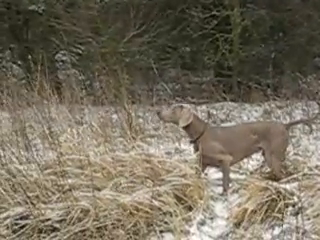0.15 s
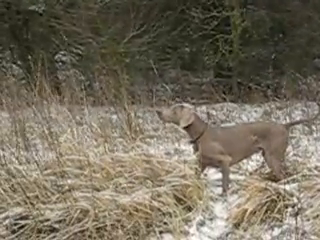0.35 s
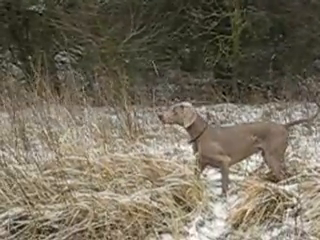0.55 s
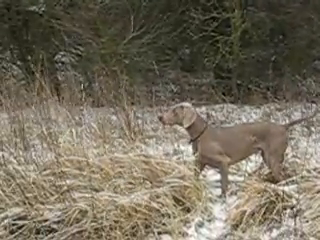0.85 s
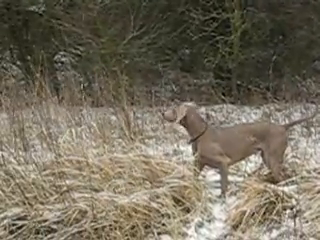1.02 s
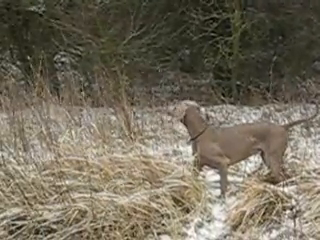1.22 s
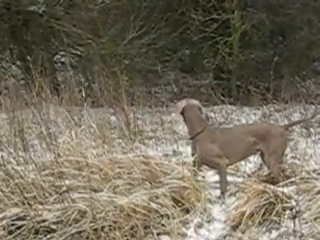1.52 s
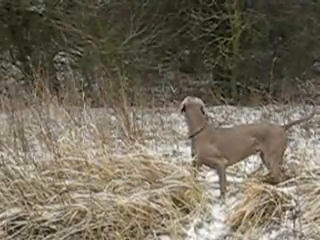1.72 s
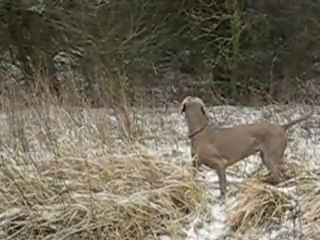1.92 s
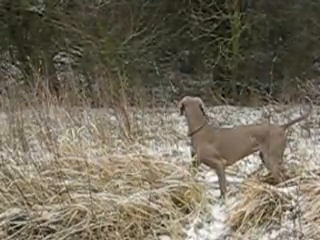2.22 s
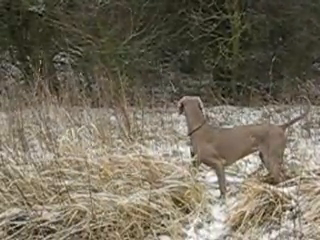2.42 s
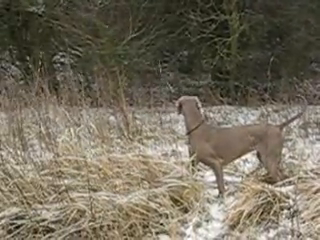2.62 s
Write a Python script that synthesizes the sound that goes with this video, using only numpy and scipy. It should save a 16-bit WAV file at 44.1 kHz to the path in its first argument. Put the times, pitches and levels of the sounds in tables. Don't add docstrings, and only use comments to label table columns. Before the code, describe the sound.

A game bird's whistling, clapping wing flutter fades into the distance amid low, bumpy wind noise outdoors

```python
import sys
import numpy as np
from scipy import signal
from scipy.fft import rfft, irfft, next_fast_len
from scipy.io import wavfile
from scipy.ndimage import map_coordinates

SR = 44100
rng = np.random.default_rng(int(sys.argv[2]) if len(sys.argv) > 2 else 0)


def gain_from_decibels(decibels):
    exponent = np.asarray(decibels, float) / 20
    return 10 ** exponent


def inscribe(sig):
    pcm = np.round(np.clip(np.atleast_2d(sig).T, -1, 1) * 32767)
    wavfile.write(sys.argv[1], SR, pcm.astype(np.int16))


N = 121275

# (frequency [Hz], level [dB])
AIR = [(300, -4), (1000, -0.5), (2200, 1), (3400, 1), (4600, -4), (6500, -19)]


def unit(x):
    return x / np.sqrt(np.mean(x ** 2) + 1e-20)


def along(points, hz):
    f, v = np.transpose(points)
    return gain_from_decibels(np.interp(np.log(hz + 1), np.log(f + 1), v))


def wobble(rate, size=N):
    knots = rng.standard_normal(int(size / SR * 4000) + 8)
    return map_coordinates(knots, [2 + np.arange(size) * min(rate, 3900) / SR])


def filtered(x, response):
    m = next_fast_len(N + SR // 2)
    hz = np.fft.rfftfreq(m, 1 / SR)
    return irfft(rfft(x, m) * response(hz), m)[..., :N]


def noise(spectrum):
    return unit(filtered(rng.standard_normal(N), lambda hz: along(spectrum, hz)))


def add(out, s, x):
    i = round(s * SR)
    part = out[max(i, 0):][:len(x) + min(i, 0)]
    part += x[max(-i, 0):][:len(part)]


def glide(hz, sag, u):
    cycles = np.cumsum(hz * (1 - sag * np.minimum(u, 1))) / SR
    return np.sin(2 * np.pi * (cycles + rng.random()))


def strokes():
    # (time [s], whistle level [dB], puff level [dB], air level [dB], moment of full force [0-1])
    downstrokes = [(-.004, -30.5, -22, -38.5, 0.5), (.071, -41.5, -36, -41, 0.9),
                   (.149, -40, -27, -35, 0.5), (.228, -33.5, -33.5, -44.5, 0.65),
                   (0.307, -38, -34, -41.5, 0.7), (.381, -30, -21.5, -34, 0.82),
                   (0.46, -30.5, -30.5, -47.5, 0.8), (.535, -31.5, -34, -38, 0),
                   (.612, -33.5, -34.5, -45, 0.19), (.769, -31.5, -24, -34.5, 0.72),
                   (.845, -32, -33, -37, 0.4), (.924, -44, -56.5, -37.5, 0.9),
                   (1.002, -29.5, -32, -36.5, 0.7), (1.238, -28, -27.5, -35, 0.1),
                   (1.312, -33, -30.5, -37, 0.2), (1.389, -35.5, -34.5, -39.5, 0.2),
                   (1.466, -33, -38, -46, 0.05), (1.543, -38, -35.5, -39.5, 0), (1.621, -43, -32, -40, 1),
                   (1.694, -39.5, -32.5, -38, 0), (1.771, -36, -37.5, -40, .24),
                   (1.85, -40, -54, -41.5, 0.8), (1.928, -36, -42, -44, 0.9),
                   (2.008, -38.5, -43, -56.5, 0.42), (2.082, -40, -47, -47, 0.3),
                   (2.165, -42.5, -44.5, -47, .3), (2.248, -45, -41.5, -54, 0.1),
                   (2.328, -35.5, -37, -54, 0.32), (2.411, -35.5, -31.5, -39, 0),
                   (2.492, -37, -36, -46.5, 0.3)]
    # (time [s], whistle onset pitch [Hz], puff pitch [Hz], fade [share of a stroke])
    effort = [
        (0, 3715, 640, 0.21),
        (0.499, 3758, 616, 0.44),
        (1.001, 3830, 585, .65),
        (1.25, 4040, 505, 0.41),
        (1.451, 4070, 584, .25),
        (1.8, 3880, 598, 0.19),
        (2.1, 3710, 614, .4),
        (2.5, 3426, 603, 0.7),
    ]
    stroke_s, puff_s = 0.012, 0.016
    end_hz = 3127
    rough = 0.42
    second_ratio, second_db = 0.75, -10
    under_ratio, under_db = 0.733, -11.5
    puff_sag = 0.16
    out, t, air = np.zeros(N), np.arange(SR // 25) / SR, noise(AIR)
    size = len(t)
    u, v = t / stroke_s, np.minimum(t / puff_s, 1)
    when, *courses = np.transpose(effort)

    def flutter():
        return 1 - rough + rough * wobble(700, size=size)

    for s, whistle_db, puff_db, air_db, crest in downstrokes:
        hz, puff_hz, fade = [np.interp(s, when, c) for c in courses]
        crest = np.clip(crest, 0.08, 0.92)
        rise = np.minimum(1, t / 0.0012) * (0.55 + 0.45 * (u / crest) ** 2)
        fall = np.exp(-np.abs((u - crest) / fade) ** 2)
        force = np.where(u < crest, rise, fall)

        sag, sink = 1 - end_hz / hz, u / (crest + fade)
        whistle = flutter() * glide(hz, sag, sink)
        whistle += gain_from_decibels(second_db) * flutter() * glide(hz * second_ratio, sag, sink)

        hollow = glide(puff_hz * (1 + 0.03 * rng.standard_normal()), puff_sag, v)
        hollow += gain_from_decibels(under_db + rng.normal(0, 3.4)) * glide(puff_hz * under_ratio, puff_sag, v)
        puff = np.sin(np.pi * v ** 0.88) * (1 + 0.54 * wobble(120, size=size)) * hollow

        grain = gain_from_decibels(2 * wobble(577, size=size))
        swell = 0.4 * force + np.sin(np.pi * v ** 0.97) ** 0.29
        swish = swell * grain * air[rng.integers(N // 2):][:size]

        beat = gain_from_decibels(whistle_db - 2 - 3.5) * unit(force * whistle)
        beat += gain_from_decibels(puff_db - 6 - 1.5) * unit(puff)
        beat += gain_from_decibels(air_db - 2 - 4.5) * unit(swish)
        add(out, s, beat)
    return out


def snaps():
    # (time [s], peak level [dB], pitch [Hz], thud level relative to peak [dB])
    snap_events = [(.0181, -19, 3450, -18), (.094, -18, 3420, -7), (.1704, -19, 3290, -6),
                   (.2474, -18.5, 3380, -13), (.3259, -20.5, 3435, -14.5), (.4036, -23.5, 3730, -5),
                   (.4797, -13, 3530, -11.5), (.5562, -18.5, 3535, -25), (.6335, -16, 3630, -12),
                   (.714, -29, 3480, -6), (.7909, -18, 3723, -8), (.8675, -16.5, 3615, -10),
                   (.9457, -16, 3590, -11), (1.0222, -17.5, 3694, -10), (1.2584, -23.5, 3290, -11),
                   (1.4876, -22.5, 3520, -13), (1.7138, -20.5, 3510, -12.5), (1.7908, -24, 3550, -20),
                   (1.8676, -21.5, 3500, -9), (1.946, -24, 3600, -7), (2.027, -33, 3500, -15),
                   (2.1893, -26, 3370, -11.5), (2.2735, -33, 3300, -2), (2.3555, -33, 3500, -15),
                   (2.4369, -31, 3470, -20), (2.4571, -32, 3290, -18), (.0805, -28, 3200, -20),
                   (.157, -23, 3150, -20), (.4662, -20, 3400, -20), (.6205, -25, 3500, -20),
                   (.778, -21, 3350, -15), (1.248, -26, 3300, -8), (1.7035, -29, 3300, -20)]
    rise_s, fall_s, sag, crack_db = 0.0016, 0.0013, 0.15, -15
    bounce_s, bounce_db = 0.0058, -12
    thud_hz, thud_peak_s, thud_lag_s, thud_gain_db = 510, 0.002, 0.00074, 4
    out, gate, t = np.zeros(N), np.zeros(N), np.arange(SR // 25) / SR
    rise = np.sin(np.pi / 2 * np.minimum(t / rise_s, 1)) ** 2
    shape = rise * np.exp(-(np.maximum(t - rise_s, 0) / fall_s) ** 0.85)
    thud_shape = t / thud_peak_s * np.exp(1 - t / thud_peak_s)
    for s, db, hz, thud_db in snap_events:
        add(out, s, gain_from_decibels(db) * shape * glide(hz * (1 + sag / 2), sag, t / 0.0033))
        bounce = gain_from_decibels(db + bounce_db + rng.normal(0, 2)) * shape * glide(hz, sag / 2, t / 0.004)
        add(out, s + bounce_s, bounce)
        add(gate, s, gain_from_decibels(db + crack_db) * shape)
        thud = thud_shape * glide(thud_hz * (1 + 0.054 * rng.standard_normal()), 0.18, t / 0.0093)
        add(out, s + thud_lag_s, gain_from_decibels(db + thud_db + thud_gain_db) * thud)
    return out + gate * noise(AIR)


def field(x):
    echo_t60, echo_lag_s = 0.31, 0.0091
    t, out, step = np.arange(SR // 3) / SR, np.zeros(N), SR // 13
    air = noise(AIR)
    decay = gain_from_decibels(-60 * t / echo_t60) * (t > echo_lag_s)
    for i in range(0, N, step):
        tail = np.roll(air, -rng.integers(N))[:len(t)] * decay
        add(out, i / SR, signal.fftconvolve(x[i:i + step], tail / np.linalg.norm(tail)))
    return out


def wind():
    # (time [s], wind strength [dB], sharpness [dB])
    gusts = [(0, -39, -18.5), (0.362, -33.5, -1.5), (0.411, -28.5, -7), (0.599, -34, 14), (0.718, -31, 2.5),
             (.92, -29, 3), (1.201, -32, -16), (1.402, -28, -5.5), (1.952, -30, -1), (2.222, -32.5, -7),
             (2.37, -29.5, 7), (2.75, -29.5, -10)]
    # (time [s], swing [full scale, push +, pull -], pitch [Hz])
    bumps = [(.1141, -.23, 180), (.3982, -.08, 105), (.409, .07, 120), (.4252, .09, 105), (.4379, .07, 110),
             (.4435, -.11, 107), (.5363, .07, 86), (.6403, -.07, 132), (.652, .06, 110), (.6565, -.12, 148),
             (.6722, -.08, 198), (.6794, -.08, 100), (.6869, .09, 177), (.7093, -.07, 106),
             (.7275, .12, 124), (.7415, .08, 110), (.75, -.08, 80), (.7877, -.07, 75), (.7942, .1, 125),
             (.818, .08, 212), (.8459, -.06, 80), (.8518, .08, 90), (.8749, .14, 81), (.8844, -.07, 70),
             (.9291, -.07, 109), (1.3003, .1, 80), (1.3967, -.09, 87), (1.4027, .07, 100),
             (1.4122, -.09, 141), (1.4171, .05, 100), (1.4217, -.07, 100), (1.4654, .07, 93),
             (1.5508, .07, 109), (1.5985, .08, 72), (1.6226, -.12, 160), (1.6257, .14, 170),
             (1.6415, .09, 110), (1.6632, -.08, 131), (1.9058, .08, 93), (1.9784, .1, 120),
             (1.9821, -.08, 128), (2.3472, -.09, 126), (2.3619, -.08, 190), (2.365, .1, 170),
             (2.3682, -.19, 168), (2.3746, -.14, 196), (2.3803, .07, 177), (2.4161, -.08, 204),
             (2.4505, .09, 146), (2.4588, -.11, 82), (2.4761, -.15, 140), (2.4961, -.1, 80),
             (2.5302, .14, 140), (2.5475, .2, 200), (2.5526, -.08, 70), (2.5977, -.11, 111),
             (2.6185, -.11, 95), (2.6246, .1, 90), (2.657, .09, 95), (2.7346, .08, 80)]
    # (frequency [Hz], spectral density [dB per Hz])
    rumble = [(15, -2), (40, -0.5), (80, -0.5), (160, -12.5), (300, -21), (600, -51)]
    # (frequency [Hz], spectral density [dB per Hz])
    rasp = [(60, -9), (150, 3.5), (300, -4), (550, -7.5), (900, -25), (1500, -41.5)]
    rasp_db, rasp_grows = -10, 2.6
    bump_cycles, bump_db = 0.26, 0.5
    s, *cols = np.transpose(gusts)
    gust_db, sharp_db = [np.interp(np.arange(N) / SR, s, c) for c in cols]
    mean_db = gust_db.mean()
    out = gain_from_decibels(gust_db) * unit(gain_from_decibels(1.5 * wobble(22)) * noise(rumble))
    rasp_level = gain_from_decibels(mean_db + rasp_grows * (gust_db - mean_db) + sharp_db + rasp_db)
    out += rasp_level * unit(gain_from_decibels(2.5 * wobble(45)) * noise(rasp))
    t = np.arange(SR // 20) / SR
    for s, swing, hz in bumps:
        c = t * hz - 1
        bump = np.cos(2 * np.pi * c) * np.exp(-(c / bump_cycles) ** 2 / 2)
        add(out, s - 1 / hz, swing * gain_from_decibels(bump_db) * bump)
    return out


def eddies():
    # (time [s], peak level [dB], pitch [Hz])
    shed = [(.671, -20.5, 686), (0.706, -26.5, 543), (.811, -27.5, 640), (.894, -32, 560),
            (1.242, -23.5, 747), (1.372, -30, 600), (2.36, -28.5, 463), (2.374, -25.5, 792),
            (2.399, -20, 520), (2.421, -29.5, 551), (2.541, -23.5, 476)]
    out, t = np.zeros(N), np.arange(SR // 25) / SR
    for s, db, hz in shed:
        u = np.minimum(t * hz / 5.4, 1)
        shape = np.sin(np.pi * u ** 0.71) * (1 + 0.45 * wobble(180, size=len(t)))
        add(out, s, gain_from_decibels(db) * shape * glide(hz, 0.26, u))
    return out


def stalks():
    # (time [s], peak level [dB], pitch [Hz])
    ticks = [(.1176, -40, 5400), (.3222, -36, 5400), (.5157, -41, 5400), (.627, -41, 5400),
             (.841, -37, 5400), (1.1525, -30, 2500), (1.153, -34, 3500), (2.0113, -34, 5400),
             (2.0453, -38, 4500), (2.177, -43, 5400), (2.4019, -35, 4600), (2.4124, -36, 5400),
             (2.4245, -37, 1900), (2.472, -38, 4000)]
    tick_t60 = 0.007
    out, t = np.zeros(N), np.arange(SR // 50) / SR
    for s, db, hz in ticks:
        ring = glide(hz, 0.1, t / 0.004) + 0.7 * (hz / 5400) ** 2 * rng.standard_normal(len(t))
        add(out, s, gain_from_decibels(db + 2 - 60 * t / tick_t60) * ring)
    return out


def camera():
    # (frequency [Hz], spectral density [dB per Hz])
    hiss = [(120, -25), (200, -2), (285, -23.5), (477, 1.5), (1240, -12), (2800, -9), (3390, -8),
            (5360, -17.5), (6780, -32), (8810, -63.5), (14900, -120)]
    # (frequency [Hz], level [dB])
    tones = [
        (2517, -60.5),
    ]
    t = np.arange(N) / SR
    whine = np.zeros(N)
    for hz, db in tones:
        whine += gain_from_decibels(db + 3.5) * np.sin(2 * np.pi * hz * t + 0.59 * wobble(7.2))
    hiss_level = gain_from_decibels(-44 + 0.7 * wobble(8) + 1.3 * wobble(350))
    return hiss_level * noise(hiss) + whine


def scene():
    bird = strokes() + snaps()
    mix = bird + gain_from_decibels(-18.5) * field(bird)
    mix = mix + stalks() + eddies() + wind() + camera()
    return mix[None]


def low_pass(x):
    return signal.sosfilt(signal.butter(12, 15800, fs=SR, output="sos"), x)


def record(dry):
    low_hz, top_hz, top_steep = 21, 6554, 15.4

    def passband(hz):
        low_cut = hz ** 2 / (hz ** 2 + low_hz ** 2)
        return low_cut / (1 + (hz / top_hz) ** top_steep) ** 2 * (hz < 7300)

    band = filtered(dry, passband)
    mix = band + gain_from_decibels(-97) * rng.standard_normal(band.shape)
    return low_pass(mix)


dry = scene()
out = record(dry)
inscribe(out)
```